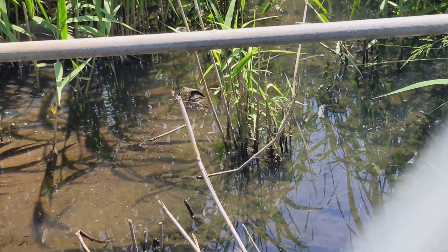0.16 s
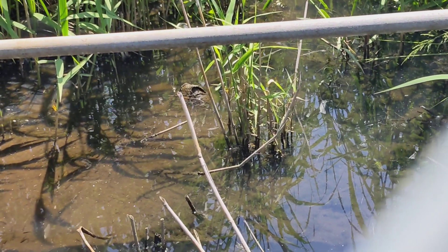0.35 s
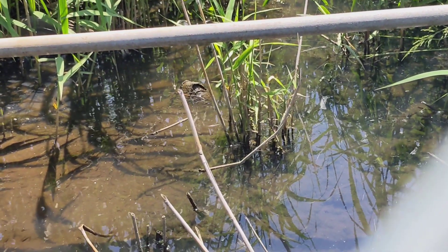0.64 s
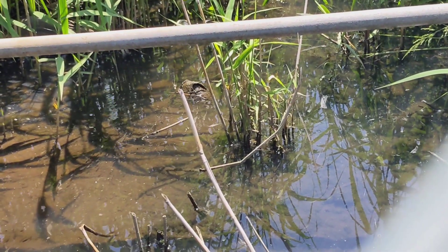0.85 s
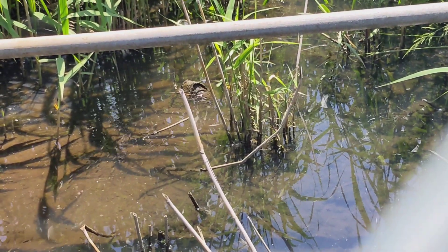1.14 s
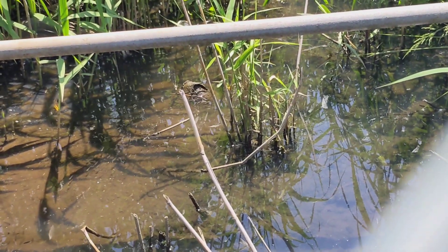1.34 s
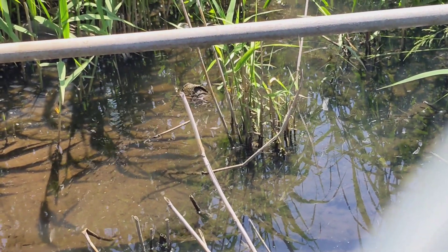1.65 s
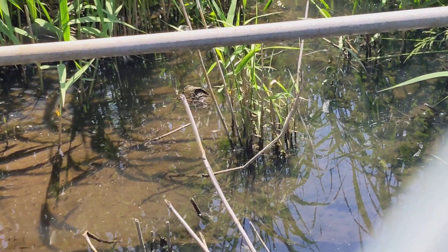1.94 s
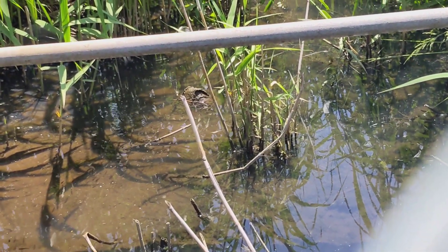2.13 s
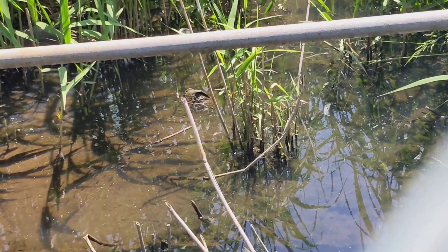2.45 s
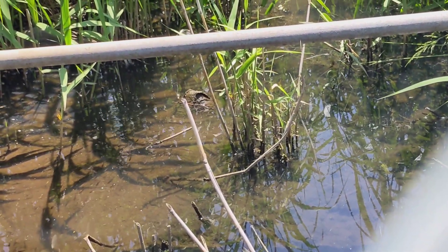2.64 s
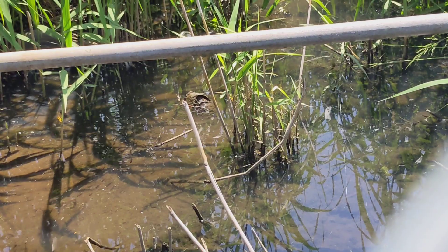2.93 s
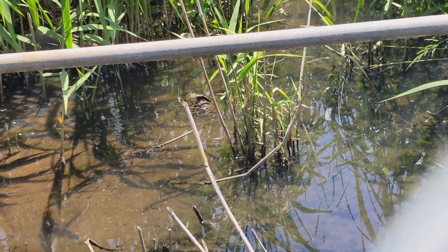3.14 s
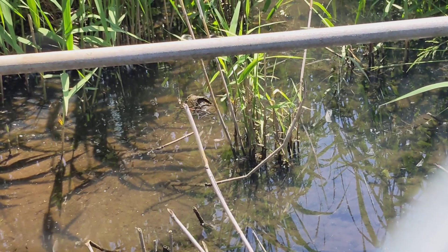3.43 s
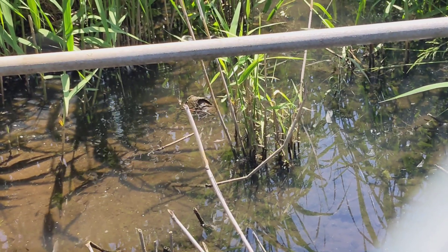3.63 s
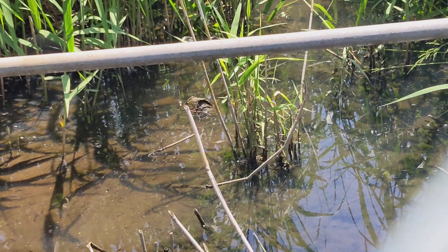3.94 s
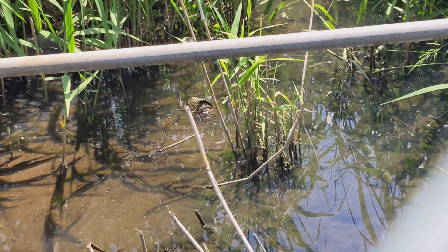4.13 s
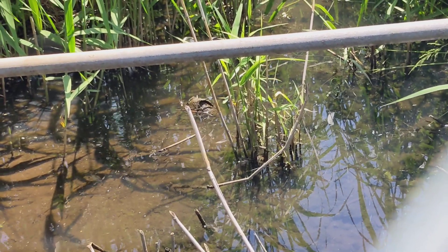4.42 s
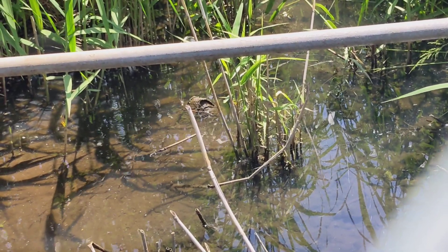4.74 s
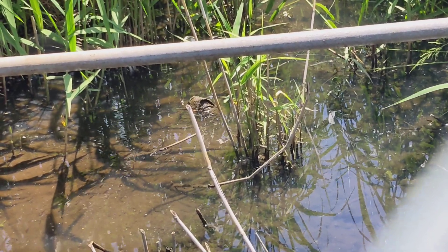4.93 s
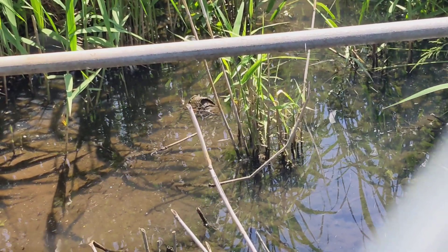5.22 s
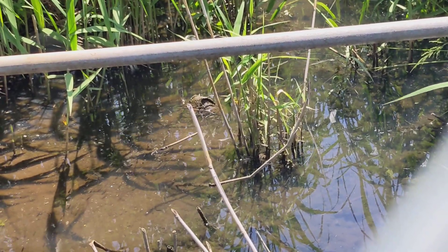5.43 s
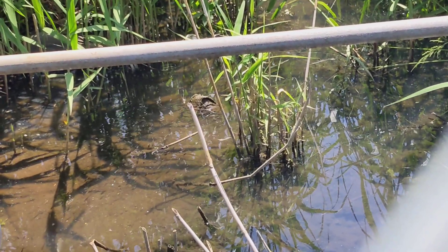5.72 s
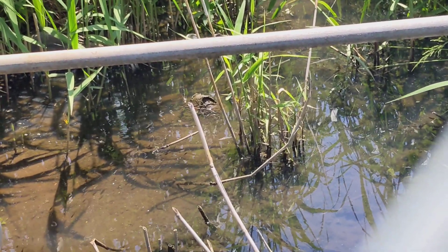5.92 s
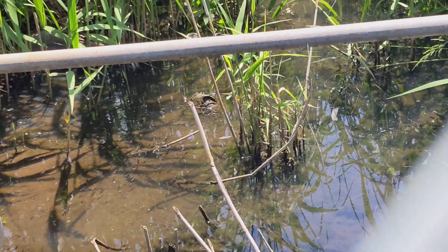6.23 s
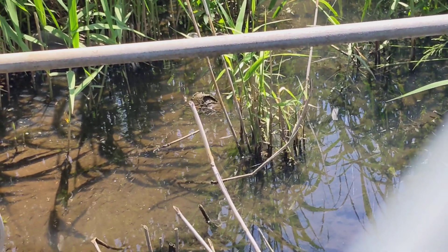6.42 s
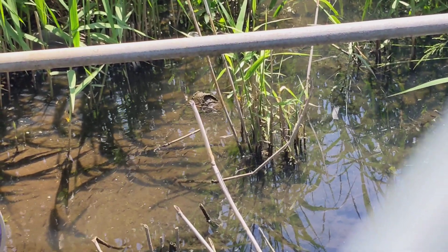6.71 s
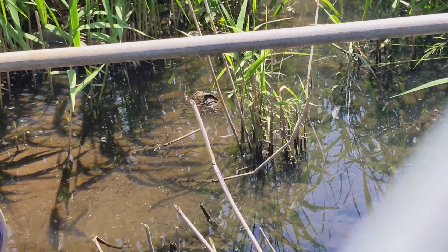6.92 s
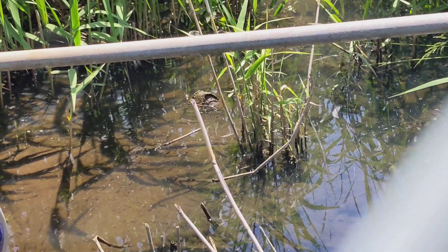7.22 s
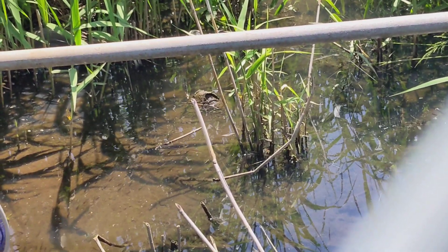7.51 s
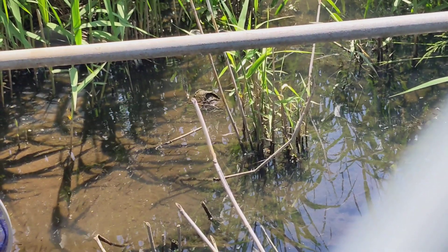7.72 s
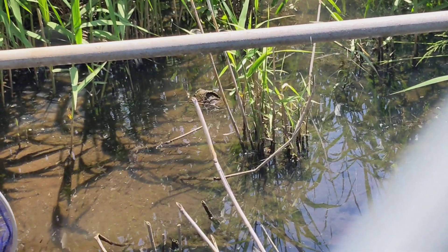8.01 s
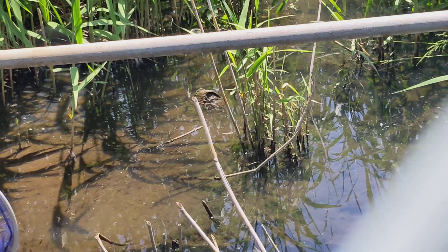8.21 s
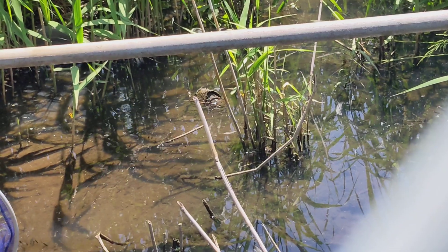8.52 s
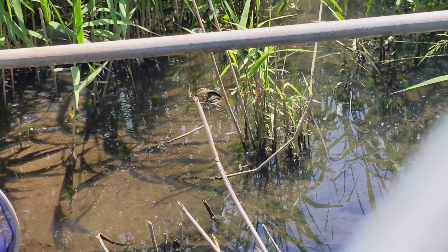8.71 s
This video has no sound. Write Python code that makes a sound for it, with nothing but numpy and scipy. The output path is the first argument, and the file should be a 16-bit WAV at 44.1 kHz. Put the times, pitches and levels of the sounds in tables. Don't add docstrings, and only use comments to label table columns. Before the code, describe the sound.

Outdoors at a reedy creek, a distant helicopter is present from the start: low fast rotor throb, steady tail hum and gusty low roar. It surges and dips, then swells strongest late with sharp blade slaps. Faint bird peeps come first; from about three seconds one bird to the left alternates a falling sweep and a short chip. Stereo microphone, dry stems ticking close by, faint hiss.

```python
import sys
import numpy as np
from scipy import signal
from scipy.fft import rfft, irfft
from scipy.io import wavfile
from scipy.ndimage import uniform_filter1d

SR = 44100
rng = np.random.default_rng(int(sys.argv[2]) if len(sys.argv) > 2 else 0)


def materialize(psi):
    bounded = np.clip(np.atleast_2d(psi).T, -1, 1)
    quanta = np.round(bounded * 32767).astype(np.int16)
    wavfile.write(sys.argv[1], SR, quanta)


def invert_db(level):
    return 10 ** (np.asarray(level, dtype=float) / 20)


N = 390726
FRAME, HOP = 1024, 256
FRAMES = N // HOP + 5
HZ = np.fft.rfftfreq(FRAME, 1 / SR)
TIMES = np.arange(FRAMES) * HOP / SR


def evened(x):
    return x / np.sqrt(np.mean(x ** 2) + 1e-20)


def read(points, hz):
    f, value = np.transpose(points)
    return np.interp(np.log(hz + 1), np.log(f + 1), value)


def follow(rows, t):
    s, *columns = np.transpose(rows)
    return [np.interp(t, s, c) for c in columns]


def add(mix, s, sound):
    part = mix[round(s * SR):][:len(sound)]
    part += sound[:len(part)]


def hums(freqs, t):
    return np.array([np.sin(2 * np.pi * (f * t + rng.random())) for f in freqs])


def drift(top_hz):
    t = np.arange(0, N + 128, 64) / SR
    freqs = np.geomspace(top_hz / 10, top_hz, num=24)
    slow = (hums(freqs, t) / np.sqrt(freqs)[:, None]).sum(0)
    return np.interp(np.arange(N) / SR, t, evened(slow))


# [f/Hz, lead/rad]
PORT_LEAD = [(20, .02), (100, .085), (300, .37), (860, 1.0), (1890, 3.0), (2330, 4.3), (5000, 8)]


def noise(level_db, same):
    a, b, c, d = rng.standard_normal((FRAMES, len(HZ), 4)).T
    same = np.clip(same, 0, 1)[:, None]
    left = a + 1j * b
    delayed = left * np.exp(-1j * read(PORT_LEAD, HZ))[:, None]
    right = same * delayed + np.sqrt(1 - same ** 2) * (c + 1j * d)
    z = np.array([left, right]) * invert_db(level_db) * np.sqrt(3 * SR / FRAME / 4)
    return signal.istft(z, nperseg=FRAME, noverlap=FRAME - HOP)[1][:, :N]


def patches(bins, frames):
    field = rng.standard_normal((FRAMES, len(HZ))).T
    return evened(uniform_filter1d(uniform_filter1d(field, bins, 0), frames, 1))


# [t/s, thrum level/dB, roar level/dB]
APPROACH = [(0.0, -7, -7.5), (0.8, -5.5, -5), (1.9, -0.5, -0.5), (3.2, -0.5, 4), (4.1, 1.2, -4.5),
            (5.1, 0, 2), (6.1, 2, 3), (6.6, 1.5, -2), (7.2, 3.5, -3), (7.7, 7, 8), (8.3, 8, 5.5),
            (8.86, 6, 5.5)]
# [t/s, half length/s, f/Hz, level/dB]
EDDIES = [(0.1, 0.39, 26, 4), (0.17, 0.05, 1250, 4.5), (0.682, 0.23, 1530, 6.5), (0.812, 0.031, 73, 6),
          (0.83, 0.13, 533, 9.5), (0.832, 0.073, 989, 11), (1.383, 0.54, 74, 5), (1.98, 0.083, 315, 8),
          (2.04, 0.17, 1351, 3), (3.172, 0.037, 724, 9.5), (3.338, 0.14, 231, 4.5),
          (3.704, 0.034, 1351, 6.5), (3.713, 0.05, 600, 9), (3.96, 0.26, 160, 2.5), (4.297, 0.056, 891, 7),
          (4.454, 0.15, 310, 7), (4.58, 0.044, 153, 7), (5.196, 0.051, 388, 1), (5.4, 0.96, 66, -1),
          (7.206, 0.073, 350, 6.5), (7.75, 0.067, 846, 7.5), (8.36, 0.036, 900, 8.5), (8.594, 0.067, 676, 7),
          (8.837, 0.076, 891, 6),
          (0.26, 0.2, 298, -9), (1.26, 0.21, 720, -5.5), (1.3, 0.25, 158, -0.5), (2.62, 0.2, 890, -6.5),
         (2.68, 0.22, 2010, -7.5), (2.78, 0.13, 482, -5), (3.96, 0.08, 1116, -5), (4.0, 0.065, 404, -7),
         (4.758, 0.14, 720, -2), (5.42, 0.024, 530, -3), (5.5, 0.097, 1250, -5), (5.6, 0.071, 253, -2.5),
         (5.601, 0.16, 397, -6.5), (5.84, 0.1, 880, -10), (6.34, 0.087, 540, -7), (6.36, 0.12, 298, -9.5),
         (6.36, 0.093, 945, -7), (6.36, 0.29, 1570, -6.5), (6.38, 0.061, 150, 7), (6.8, 0.44, 152.7, -13.5),
         (6.82, 0.058, 111, -9), (7.4, 0.061, 472, -6.5), (8.359, 0.51, 74.8, -8), (8.52, 0.1, 281, -10.5),
          (0.98, 0.11, 106, -4), (2, 0.038, 130, 7), (2.4, 0.26, 102, 2.5), (4.34, 0.26, 95, -4),
         (2.9, 0.28, 178, -0.5), (3.23, 0.24, 87, 4.5), (1.034, 0.039, 320, -10), (6.5, 0.19, 3000, -9),
         (3.95, 0.12, 2500, -10.5), (8.4, 0.22, 100, 5), (7.9, 0.14, 850, 1.5), (6.7, 0.088, 450, 4),
         (8.1, 0.64, 179, -5.5), (7.5, 0.33, 134, 3), (5.0, 0.051, 890, 1), (5.6, 0.074, 320, -0.5),
         (3.33, .15, 120, -5), (4.5, 0.076, 770, 1.5),
          (4.7, 0.029, 580, 1.5), (5.15, 0.21, 73, 5), (8.24, 0.055, 300, 6), (7.95, 0.024, 270, 4.5),
          (8.07, 0.046, 650, 5.5), (5.15, 0.055, 910, 6.5), (7.72, 0.011, 550, 4), (7, .05, 1100, 4),
          (3.4, 0.072, 280, 3), (5.62, 0.091, 380, -4.5), (7.47, 0.022, 750, 3.5), (5.1, .06, 270, -3),
          (6.45, .04, 370, -3.5), (2.7, 0.057, 750, 1), (1.45, 0.065, 320, 3), (0.563, 0.037, 420, 6),
          (3, 0.023, 360, 4), (8.68, 0.021, 610, 4), (5.9, 0.081, 370, 1), (5.1, 0.069, 270, 0.5),
          (3.7, .08, 270, -3), (5.12, 0.17, 370, 4.5), (4.55, 0.054, 490, -2.5), (5.9, 0.079, 820, 2),
          (1.6, 0.1, 1300, 1.5), (1.8, 0.34, 210, -5.5), (4.2, 0.11, 160, 3), (7.3, 0.064, 880, 2),
          (2.8, 0.031, 830, 6), (7.75, 0.058, 1580, 4.5), (8.0, 0.12, 440, -1), (3.74, .1, 88, -3)]


def reach(hz):
    thrum, rush = follow(APPROACH, TIMES)
    hz = np.asarray(hz, float)[:, None]
    high = np.interp(hz, (140, 180), [0, 1])
    s, half, centre, db = np.transpose(EDDIES)
    eddy_octaves = 0.33
    ranges = np.exp(-.5 * (np.log2((hz + 1) / centre) / eddy_octaves) ** 2)
    moments = np.exp(-.5 * ((TIMES - s[:, None]) / half[:, None]) ** 2)
    return (1 - high) * thrum + high * rush + (ranges * db) @ moments


# [t/s, ground echo delay/ms, extra air loss/(dB per kHz)]
PATH = [(0, 2.41, 15), (1, 2.31, 12), (2, 2.41, 5.5), (3, 2.73, 6), (4, 2.61, 1.5), (5, 2.88, 7),
        (6, 2.89, 6.5), (7, 2.96, -3), (8, 2.97, -7), (8.86, 3.27, -3)]
ECHO_SHARE = [0.81, 0.53]


def ground(hz, share):
    hz = np.asarray(hz, float)[:, None]
    delay_s = follow(PATH, TIMES)[0] / 1000
    return 20 * np.log10(abs(1 + share * np.exp(-hz / 1800 + 2j * np.pi * hz * delay_s)))


# [t/s, main rotor f/Hz, tail rotor f/Hz]
BLADE_RATES = [(0, 27.6, 106.45), (1, 27.5, 106.3), (3, 27.4, 106.17), (4, 27.26, 105.9),
               (5, 27.17, 105.43), (6, 27.06, 105.08), (7, 26.78, 104.24), (8, 26.6, 103.4),
               (8.86, 26.42, 102.8)]
# [order, level/dB]
MAIN_ORDERS = [(1, -44), (2, -43), (3, -50.5), (4, -65.5), (5, -52.5), (6, -68)]
# [order, level/dB]
TAIL_ORDERS = [(1, -41.5), (2, -52.5), (3, -51), (4, -55)]
# [level/dB, right port level/dB]
GEAR_WHINE = [(-69, 0), (-89, -4)]


def main_rotor(phase, mean_hz, path_db):
    flutter_db = 1.5
    skew = np.linspace(-1.1, 1.0, N)
    out = np.zeros(N)
    for k, db in MAIN_ORDERS:
        bend = 1.05 * (k - 1) ** 2 + skew * (k - 1) ** .6
        level = invert_db(db + path_db(k * mean_hz) + flutter_db * drift(3))
        out += level * np.cos(k * (phase - 2.2) + bend)
    return out


def tail_rotor(phase, mean_hz, path_db):
    shimmer_db, wander = 0.72, 0.17
    out = np.zeros((2, N))
    for k, db in TAIL_ORDERS:
        lead = read(PORT_LEAD, np.array([[0], [k * mean_hz]]))
        level = invert_db(db + path_db(k * mean_hz) + k * shimmer_db * drift(8))
        out += level * np.cos(k * (phase - 2.5 + wander * drift(8)) - lead)
    return out


def gears(tail_phase, tail_hz):
    t = np.arange(N) / SR
    out = np.zeros((2, N))
    for teeth, (db, right_db), aim_s in zip((22.86, 39.12), GEAR_WHINE, (3.9, 1.8)):
        mesh = teeth * tail_phase + .95 * drift(60) - np.array([[0], [4.3]])
        beam_db = -600 * teeth ** -1.5 * ((t - aim_s) / 2.3) ** 2
        swell_db = 0.7 * np.interp(t, TIMES, reach([teeth * tail_hz])[0]) + beam_db
        out += invert_db(db + swell_db + 3.0 * drift(30)) * np.cos(mesh) * invert_db([[0], [right_db]])
    return out


def rotors():
    t = np.arange(N) / SR
    main, tail = 2 * np.pi * np.cumsum(follow(BLADE_RATES, t), 1) / SR
    main_hz, tail_hz = np.mean(BLADE_RATES, 0)[1:]

    def path_db(hz):
        return np.interp(t, TIMES, (reach([hz]) + ground([hz], np.mean(ECHO_SHARE)))[0])

    blades = main_rotor(main, main_hz, path_db) + tail_rotor(tail, tail_hz, path_db)
    return np.sqrt(2) * (blades * invert_db([[-.3], [.3]]) + gears(tail, tail_hz))


# [f/Hz, level/dB per Hz]
ROAR_COLOUR = [(12, -21.5), (28, -5.5), (70, -2), (125, -3), (160, -8), (200, -7.5), (400, -5),
               (650, -12.5), (1000, -15), (1300, -20.5), (1560, -25.5), (1850, -30.5), (2600, -34),
               (3300, -48), (4200, -62.5), (7000, -110)]
# [f/Hz, share]
PORT_LIKENESS = [(60, .998), (300, .992), (480, .96), (570, .8), (660, .97), (850, .85), (1000, .92),
                 (1300, .7), (2000, .47), (5000, .3)]
# [f/Hz, left minus right level/dB]
PORT_BALANCE = [(60, -3), (92, 3), (140, 1.5), (210, -4.5), (330, 0), (500, -1.5), (770, -3), (1170, -5),
                (1790, -3.5), (2740, 5.5), (4190, 1), (6410, -2), (9810, -8), (15000, -10)]


def roar():
    air_loss = np.maximum(follow(PATH, TIMES)[1], 0)
    loss_db = air_loss * np.maximum(HZ - 1500, 0)[:, None] / 1000
    comb_db = ground(HZ, np.array(ECHO_SHARE)[:, None, None])
    sides_db = np.array([.5, -.5])[:, None, None] * read(PORT_BALANCE, HZ)[:, None]
    shape_db = read(ROAR_COLOUR, HZ)[:, None] + comb_db - loss_db + sides_db
    gusts_db = 1.5 * patches(bins=5, frames=9) + 1.16 * patches(bins=40, frames=3)
    gusts_db *= np.minimum(HZ / 250, 1)[:, None]
    return noise(-60 + shape_db + reach(HZ) + gusts_db, read(PORT_LIKENESS, HZ))


# [f/Hz, level/dB per Hz]
AIR_COLOUR = [(1500, -9.5), (2200, -1), (3000, -5), (3700, -10.5), (4500, -12), (5200, -16), (5700, -18),
              (6100, -18), (7000, -14.5), (7500, -21), (8100, -25.5), (9500, -27), (12000, -38.5)]


def air():
    colour_db = read(AIR_COLOUR, HZ)
    power = (invert_db(colour_db) ** 2).sum() * HZ[1]
    colour_db = colour_db - 69.63 - 10 * np.log10(power)
    sides_db = colour_db + np.array([[.5], [-.5]]) * read(PORT_BALANCE, np.minimum(HZ, 7000))
    swell_db = 0.21 * follow(APPROACH, TIMES)[0] + patches(bins=12, frames=12)
    return noise(sides_db[..., None] + swell_db, 0 * HZ + .1)


# [t/s, peak level/dB, f/Hz]
REED_TICKS = [(.098, -62, 3900), (.126, -60, 3500), (.39, -65, 3700), (.415, -62, 3900), (1.001, -70, 7500),
              (1.164, -66, 8000), (1.642, -59.5, 7000), (1.643, -61.5, 3300), (2.017, -64.5, 6500),
              (3.161, -62, 5500), (4.799, -61.5, 5100), (4.803, -59, 5500), (4.806, -62.5, 7600),
              (4.811, -63, 5100), (6.195, -64, 8000), (6.344, -72, 6500), (7.491, -65.5, 6950)]


def reeds():
    out, t = np.zeros(N), np.arange(220) / SR
    for s, db, hz in REED_TICKS:
        ring = invert_db(db - 60 * t / 0.0029) * np.sin(2 * np.pi * hz * t)
        click = invert_db(db - 10.0 - 60 * t / .006) * rng.standard_normal(len(t))
        add(out, s, ring + click)
    return out * invert_db([[1.5], [-1.5]])


# [t/s, peak level/dB]
BLADE_SLAPS = [(0.1938, -36), (0.3836, -39.2), (0.4857, -37.6), (0.5199, -37.9), (0.5949, -33),
               (1.1759, -37), (1.479, -36), (1.6486, -34), (2.7906, -33), (2.9435, -32), (3.039, -31),
               (3.147, -24), (3.287, -35), (3.3768, -30), (3.5103, -36), (3.6064, -37), (3.6419, -33.1),
               (3.6866, -32.4), (5.1374, -32), (5.2183, -30), (5.289, -33), (5.5224, -33.2),
               (5.7833, -36.1), (6.0119, -32), (6.034, -38), (6.2239, -39), (6.7583, -34), (6.7833, -33),
               (7.4783, -26), (7.6095, -31), (7.6219, -26), (7.7129, -21.9), (7.7212, -16.5),
               (7.776, -21.4), (7.7953, -22), (7.854, -27.1), (8.5222, -25), (8.571, -23), (8.609, -28),
               (8.6843, -27)]


def slaps():
    out, t = np.zeros((2, N)), np.arange(-100, 100) / SR
    u = (np.pi * 760 * t) ** 2
    spike = invert_db(-1) * (1 - 2 * u) * np.exp(-u)
    for s, db in BLADE_SLAPS:
        echo_s = follow(PATH, s)[0] / 1000
        for port, (late_s, port_db) in enumerate(((-.0001, -1.2), (.0001, 1.2))):
            start = s + late_s + t[0]
            add(out[port], start, invert_db(db + port_db) * spike)
            add(out[port], start + echo_s, 0.28 * invert_db(db) * spike)
    return out


def note(shape, rough=1):
    t = np.arange(shape[0][0], shape[-1][0], 1 / SR)
    hz, db = follow(shape, t)
    flutter, wobble = (hums((37, 64, 110, 145), t).sum(0) for _ in range(2))
    hz = uniform_filter1d(hz, size=120)
    strain = 1 + 2.0 * rough ** 2 * np.clip((hz - 5750) / 400, 0, 1)
    hz = hz * (1 + .004 * rough * strain * wobble)
    tone = np.sin(2 * np.pi * np.cumsum(hz) / SR) * signal.windows.tukey(len(t), .2)
    return np.sqrt(2) * invert_db(db + 1.7 * rough * flutter) * tone


# [t/s, length/s, first f/Hz,
# last f/Hz, level/dB]
RISES = [(.44, .035, 3300, 3450, -77), (1.095, 0.019, 3830, 3800, -79), (1.392, 0.045, 2780, 2770, -73),
         (5.643, .04, 4680, 4700, -80), (5.794, 0.023, 3080, 3060, -73), (6.033, .03, 3700, 4600, -71),
         (4.803, .006, 5300, 5500, -72), (6.128, 0.024, 3120, 3200, -72), (6.13, 0.017, 4150, 4200, -76),
         (6.637, .028, 3900, 3930, -75), (7.44, .032, 2940, 3750, -64), (7.85, .035, 7250, 7250, -85),
         (1.0, .015, 3400, 3450, -82), (1.585, .04, 2780, 2770, -77), (2.39, .045, 2760, 2750, -74),
         (4.555, .045, 2800, 2820, -69), (7.47, .025, 6100, 6900, -84)]
FALLS = [(2.518, .014, 6000, 5500, -82), (2.524, .016, 4550, 3600, -76), (2.538, 0.017, 4250, 3200, -71),
         (2.575, .015, 3600, 3200, -81), (5.455, 0.033, 3130, 3040, -73), (6.11, .04, 4700, 4630, -82),
         (6.65, .012, 3900, 2950, -71), (7.428, .014, 4000, 2950, -73), (5.748, .014, 4400, 4300, -74),
         (6.472, .022, 4350, 4200, -77), (2.53, .02, 3900, 3500, -75)]
SWOOPS = [
    (6.737, 0.11, 5800, 4820, -71),
    (7.53, .115, 5880, 4860, -69),
]
# [t/s,
# climb/s, first f/Hz, peak f/Hz, level/dB]
HOOKS = [(5.165, .02, 4250, 4700, -74), (5.722, .015, 4050, 4680, -73), (6.657, .02, 2900, 3320, -69),
         (6.438, .022, 3500, 4400, -75), (7.192, .016, 4250, 4580, -70), (4.798, .004, 5000, 5200, -77)]
# [t/s, f/Hz, level/dB]
WARBLE_STEPS = [(7.882, 7100, -83), (7.892, 5900, -74), (7.912, 5000, -73), (7.928, 4950, -71),
                (7.934, 4550, -72), (7.948, 4120, -68), (7.97, 4150, -64), (7.988, 3850, -73)]
WARBLE_RIPPLE = [(8.026, 3800, -78), (8.044, 4250, -71), (8.068, 4080, -73), (8.086, 4200, -70),
                 (8.098, 4450, -65), (8.106, 4400, -72)]


def other_birds():
    out, clean = np.zeros(N), .55
    u = np.linspace(0, 1, num=9)
    dip_db = np.interp(u, [0, .4, .85, 1], [7, 3, 0, 3])
    for ease, calls in ((1.3, RISES), (1.01, FALLS), (2.25, SWOOPS)):
        for s, length, first_hz, last_hz, db in calls:
            glide = last_hz + (first_hz - last_hz) * (1 - u) ** ease
            add(out, s, note(np.transpose([u * length, glide, db - dip_db]), clean))
    for s, climb, first_hz, peak_hz, db in HOOKS:
        droop = (climb + .022, peak_hz - 380, db - 3)
        add(out, s, note([(0, first_hz, db - 6), (climb, peak_hz, db), droop], clean))
    for shape in (WARBLE_STEPS, WARBLE_RIPPLE):
        add(out, shape[0][0], note(shape, clean))
    return out


# [t from the mark/s, f/Hz, level/dB]
SWEEP_SHAPE = [(-.062, 5600, -24), (-.035, 5720, -14), (-.014, 6050, -15), (0, 6600, -14),
               (.016, 5550, -12), (.035, 4850, -5), (.065, 4250, 0), (.108, 3420, -3), (.12, 3300, -18),
               (.155, 2850, -8)]
CHIP_SHAPE = [(-.006, 3900, -16), (.006, 4130, -4), (.024, 4430, 0), (.046, 4700, -1), (.062, 4200, -4),
              (.068, 4100, -30), (.07, 5350, -30), (.076, 5300, -18), (.092, 4900, -23)]
# [t/s, level/dB, stretch, direct-path level/dB as the head turns]
SWEEP_CALLS = [
    (2.798, -71, .98, -.5),
    (3.536, -65.5, 1.0, -1),
    (4.271, -64.5, 0.95, 0),
    (5.022, -64, 0.98, 1),
    (6.650, -69.5, .97, -3),
    (7.402, -65, 1.01, -1),
    (8.157, -64.5, 0.97, 0.5),
]
CHIP_CALLS = [
    (3.068, -63, 1.0, -.5),
    (3.799, -62.5, 1.02, -.5),
    (4.539, -60, 0.93, 1),
    (5.293, -60.5, 0.98, .5),
    (6.922, -66.5, 1.2, -3),
    (7.668, -64, 1.14, -2),
    (8.432, -65, 1.06, -1.5),
]


def singer():
    facing, song = np.zeros((2, N))
    for shape, calls in ((SWEEP_SHAPE, SWEEP_CALLS), (CHIP_SHAPE, CHIP_CALLS)):
        for s, db, stretch, turn_db in calls:
            start = s + stretch * shape[0][0]
            call = invert_db(db) * note(np.multiply(shape, [stretch, 1, 1]))
            add(song, start, call)
            add(facing, start, invert_db(turn_db) * call)
    return facing, song


def bank(direct, x, echo_db, tail_db, t60):
    taps = np.zeros((2, SR))
    at = np.arange(100, SR - 30, 30) + rng.integers(0, 30, (2, (SR - 101) // 30))
    sizes = rng.standard_normal(at.shape)
    near = invert_db(-60 * at / SR / t60)
    far = invert_db(-2 - 60 * at / SR / (3.0 * t60))
    np.put_along_axis(taps, at, sizes * abs(sizes) * (near + far), 1)
    taps *= invert_db(tail_db) / np.linalg.norm(taps[0])
    taps = signal.lfilter(*signal.iirpeak(4700, 1.1, SR), taps)
    taps[[0, 1], [1590, 1610]] += invert_db(echo_db)
    taps[[0, 1], [4300, 4260]] += invert_db(echo_db - 4)
    echoes = signal.fftconvolve(x[None], taps, axes=1)[:, :N]
    return np.array([np.roll(direct, 12), direct]) + echoes


def shade(x, tilt_db):
    octaves = np.log2(np.clip(np.fft.rfftfreq(N, 1 / SR), 2500, 8000) / 4400)
    return irfft(rfft(x) * invert_db(tilt_db * octaves * np.array([[-.5], [.5]])), N)


def birds():
    others = other_birds()
    others = bank(others, others, echo_db=-22, tail_db=-12, t60=.15) * invert_db([[2.5], [-3]])
    facing, song = singer()
    song = bank(facing, song, echo_db=-10, tail_db=-3, t60=0.35) * invert_db([[2.2], [-4.5]])
    return shade(song + others, tilt_db=4)


def scene():
    return rotors() + roar() + air() + reeds() + slaps() + birds()


# [f/Hz, level/dB per Hz]
LEFT_HISS = [(7000, -26), (9000, -19), (11000, -19), (13000, -23), (14500, -21), (16000, -25)]
RIGHT_HISS = [(7000, -24), (9000, -15), (10000, -12), (11300, -2), (12000, 0), (12600, -6), (13300, -4),
              (14000, -6), (15200, -8), (16000, -21)]


def port_noise():
    colour_db = np.array([read(LEFT_HISS, HZ), read(RIGHT_HISS, HZ)])[..., None]
    hiss = noise(-103 + colour_db - 40 * (HZ < 6000)[:, None], 0 * HZ)
    phase = 2 * np.pi * 13482 * np.arange(N) / SR + .4 * drift(3)
    hiss[1] += invert_db(-91) * np.sqrt(2) * np.sin(phase)
    return hiss


def top_cut(x):
    return signal.sosfilt(signal.butter(12, 15720, fs=SR, output="sos"), x)


def record(dry):
    fade_in = np.minimum(np.arange(N) / (.006 * SR), 1)
    return top_cut((dry + port_noise()) * fade_in)


dry = scene()
out = record(dry)
materialize(out)
```